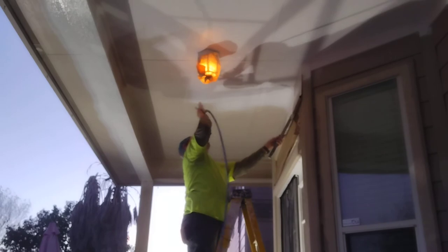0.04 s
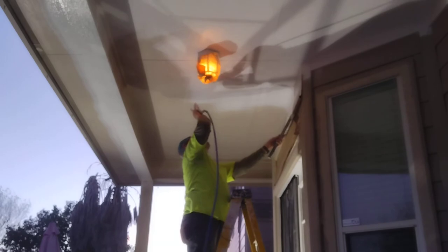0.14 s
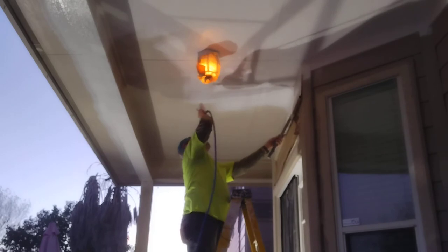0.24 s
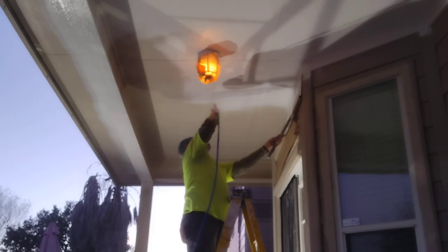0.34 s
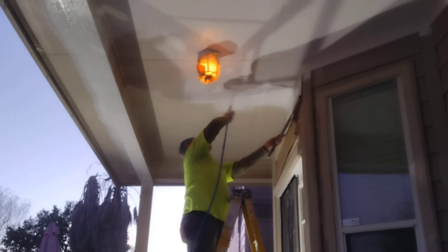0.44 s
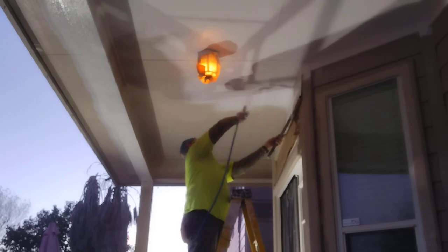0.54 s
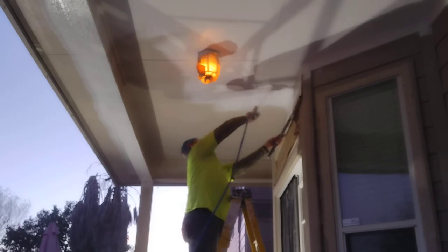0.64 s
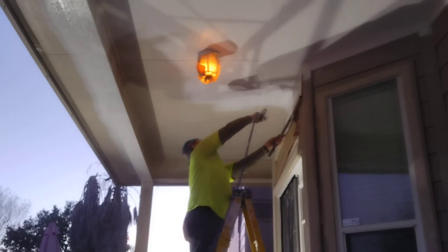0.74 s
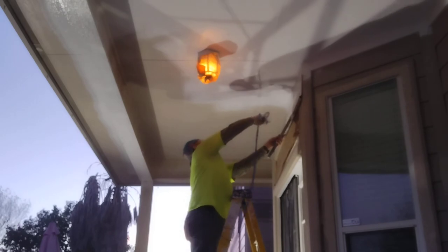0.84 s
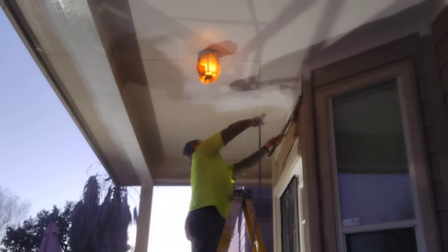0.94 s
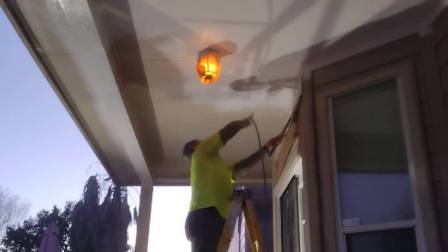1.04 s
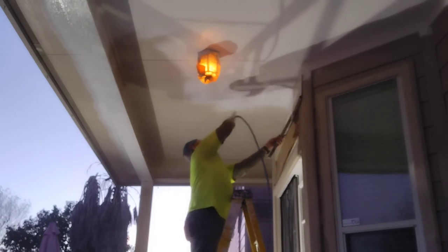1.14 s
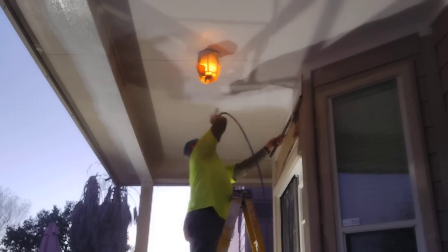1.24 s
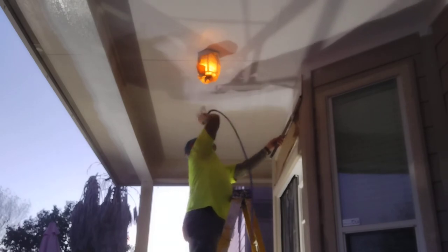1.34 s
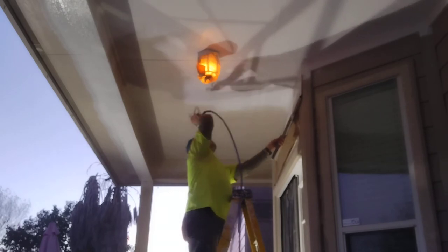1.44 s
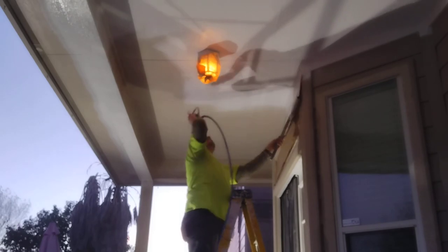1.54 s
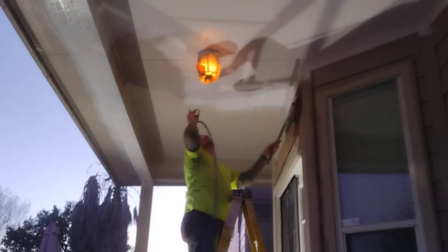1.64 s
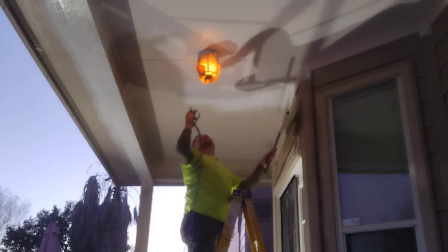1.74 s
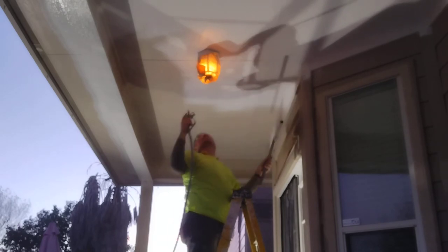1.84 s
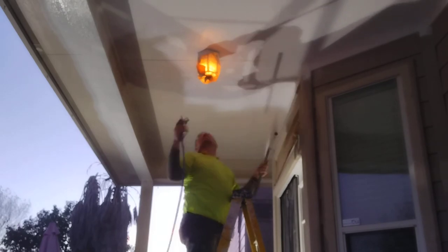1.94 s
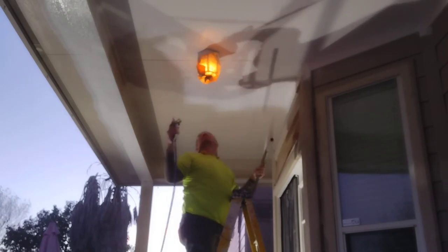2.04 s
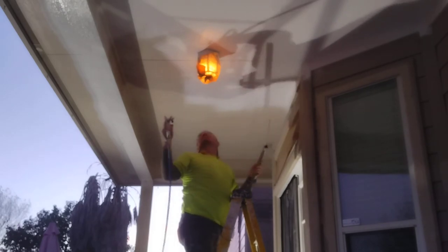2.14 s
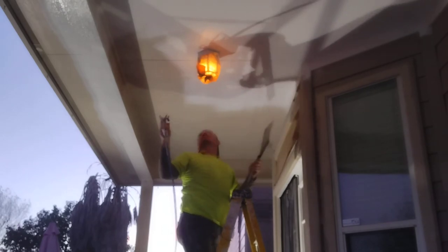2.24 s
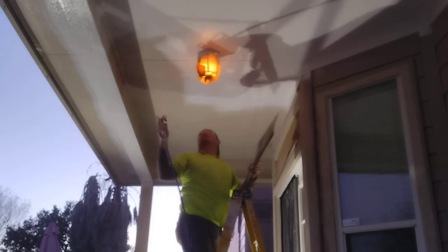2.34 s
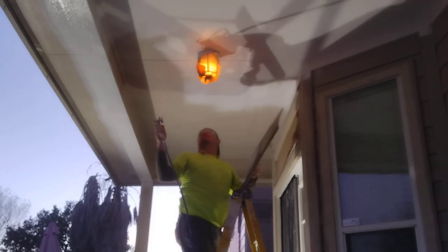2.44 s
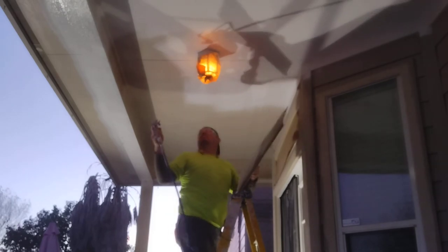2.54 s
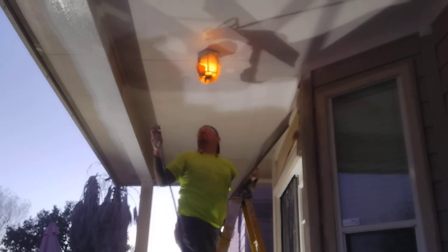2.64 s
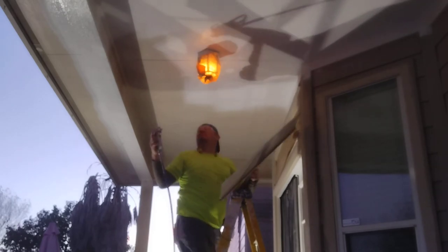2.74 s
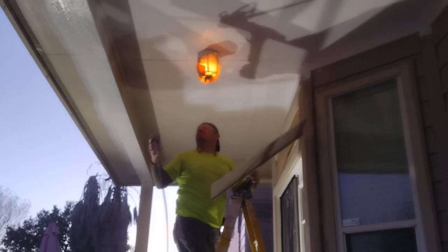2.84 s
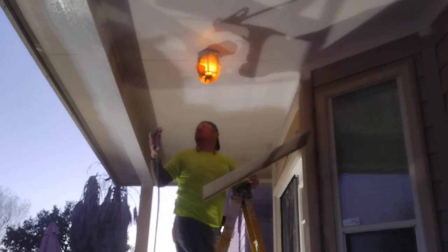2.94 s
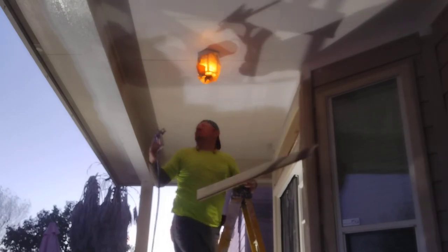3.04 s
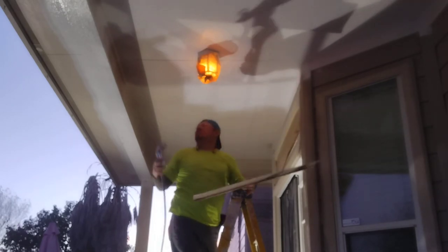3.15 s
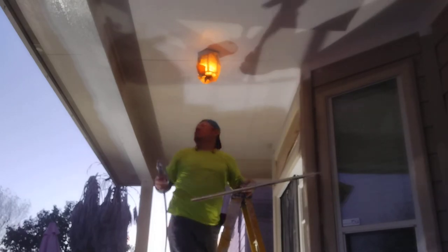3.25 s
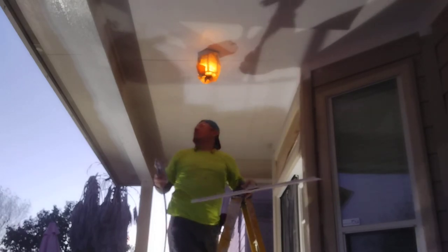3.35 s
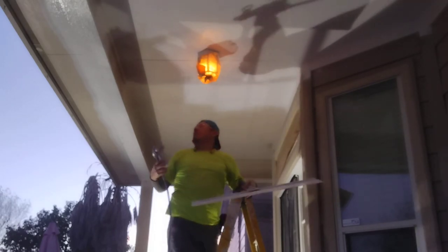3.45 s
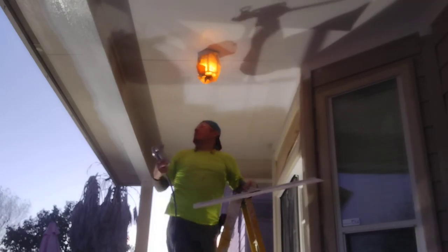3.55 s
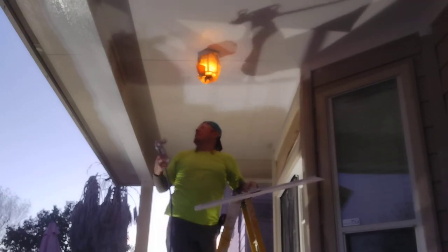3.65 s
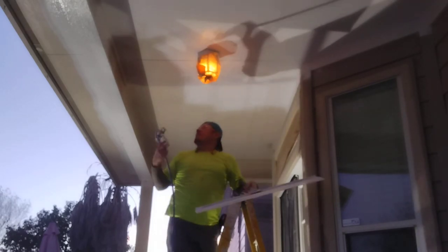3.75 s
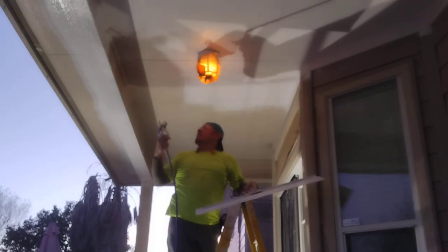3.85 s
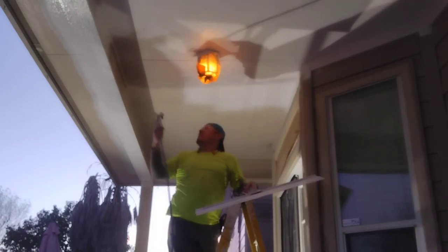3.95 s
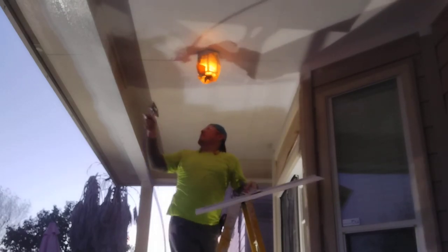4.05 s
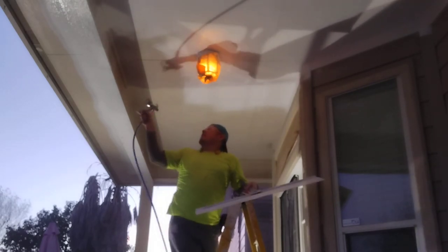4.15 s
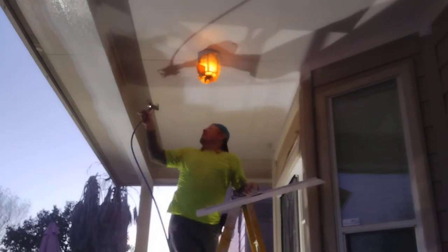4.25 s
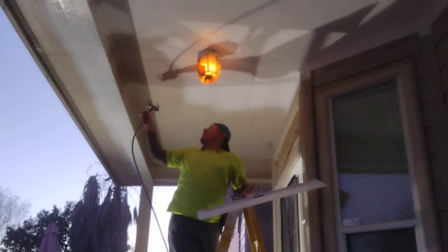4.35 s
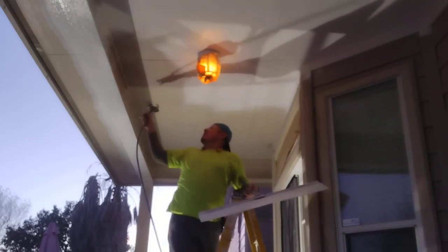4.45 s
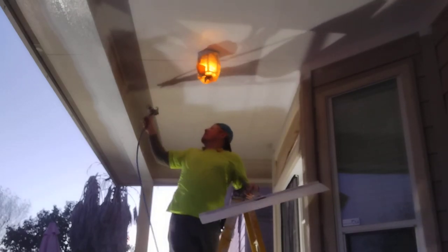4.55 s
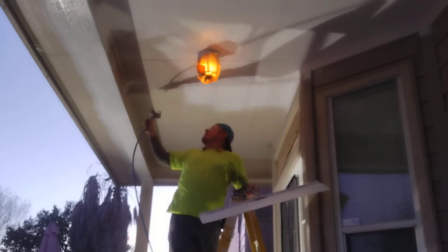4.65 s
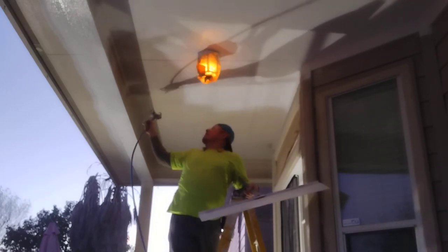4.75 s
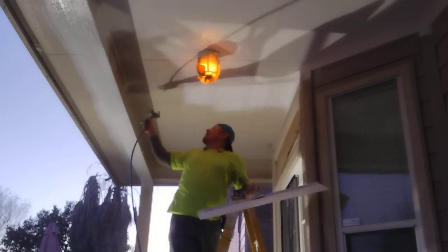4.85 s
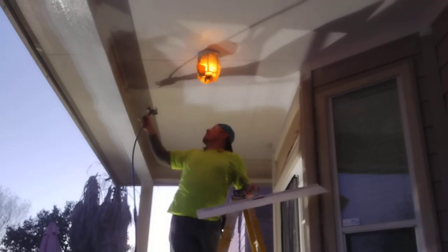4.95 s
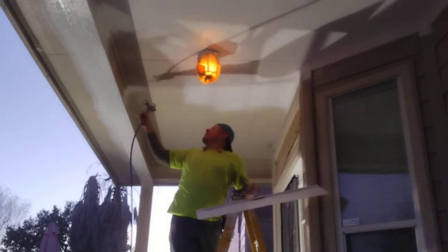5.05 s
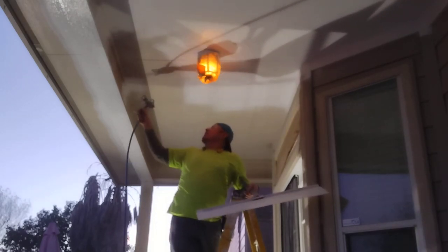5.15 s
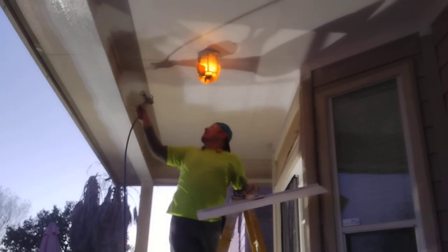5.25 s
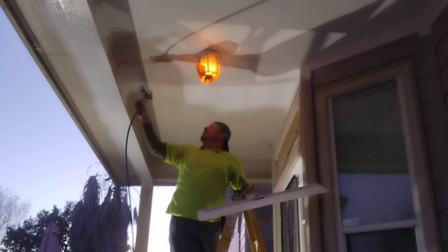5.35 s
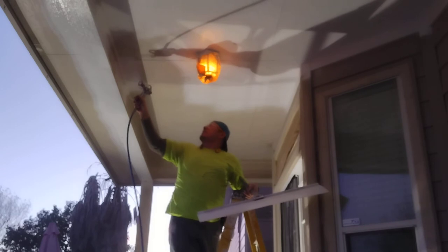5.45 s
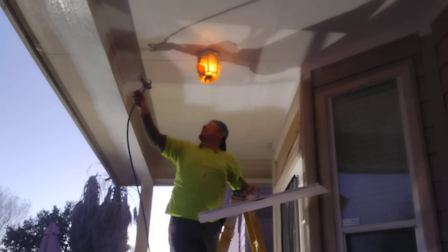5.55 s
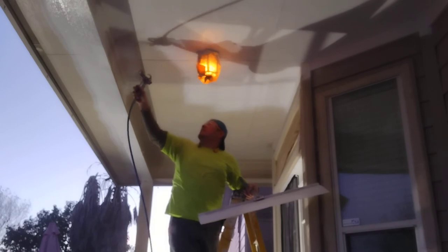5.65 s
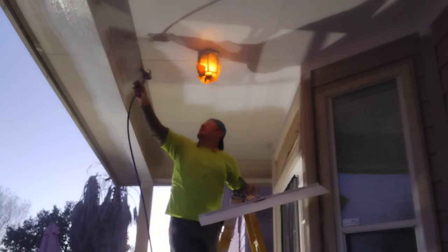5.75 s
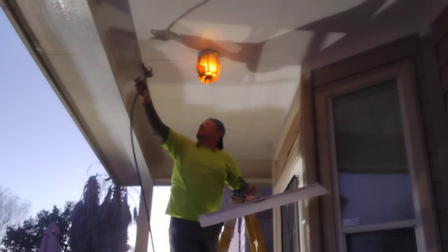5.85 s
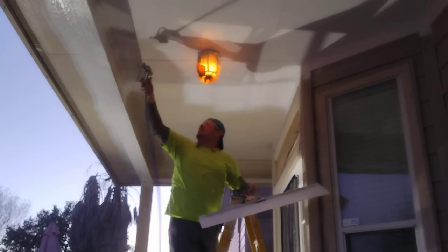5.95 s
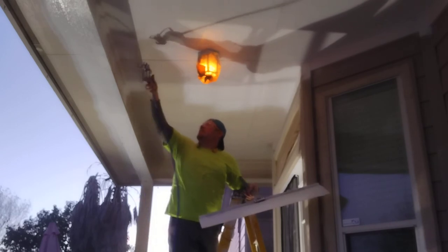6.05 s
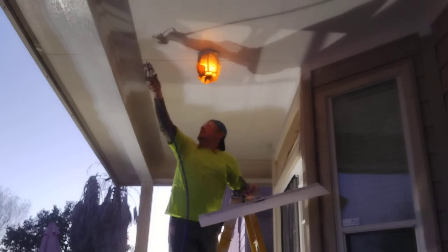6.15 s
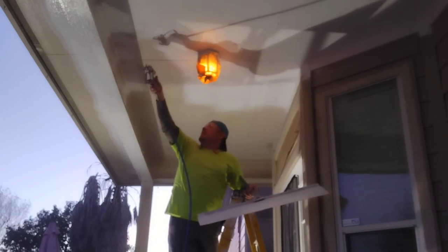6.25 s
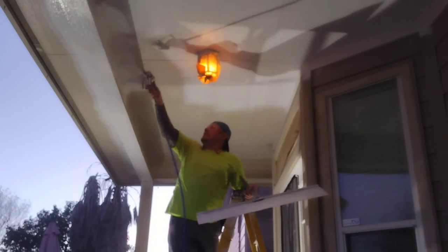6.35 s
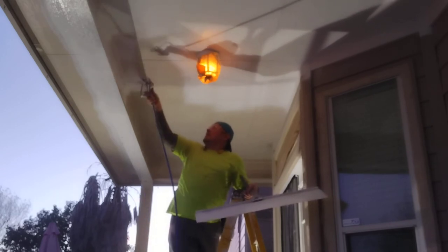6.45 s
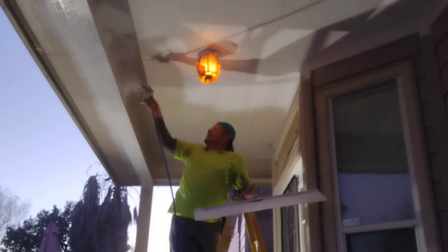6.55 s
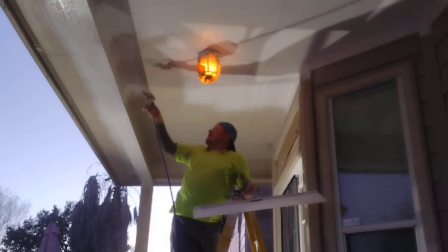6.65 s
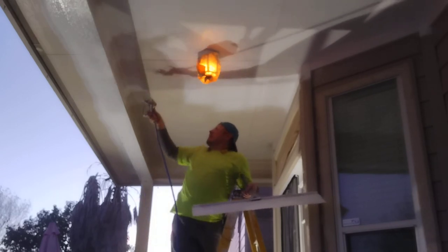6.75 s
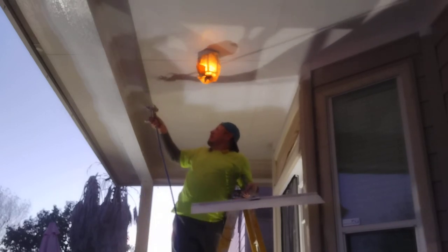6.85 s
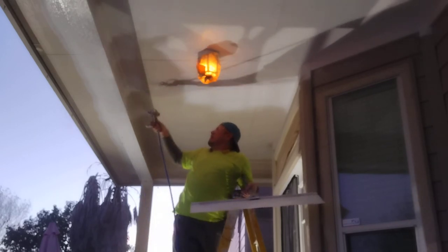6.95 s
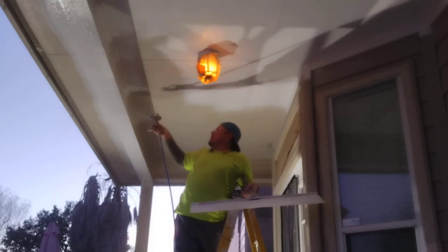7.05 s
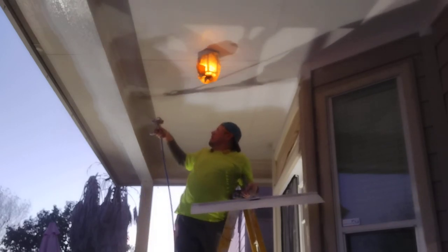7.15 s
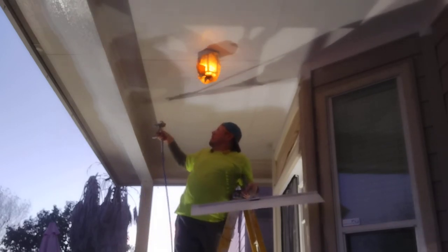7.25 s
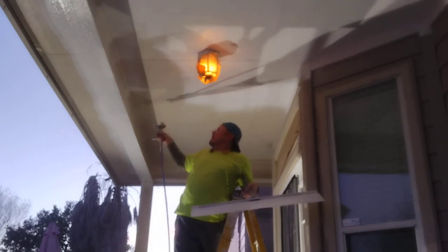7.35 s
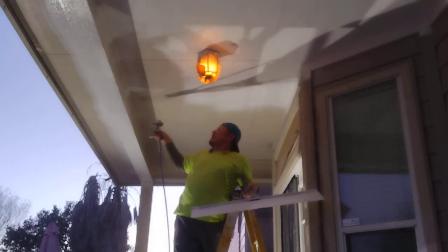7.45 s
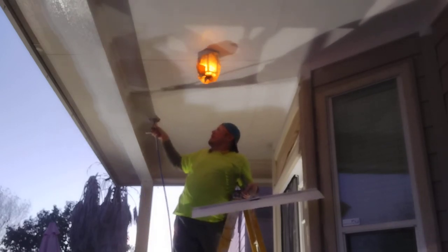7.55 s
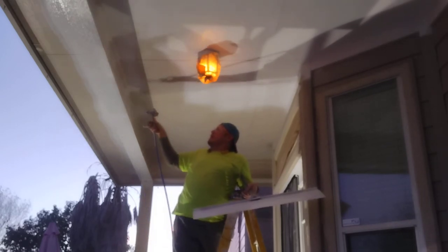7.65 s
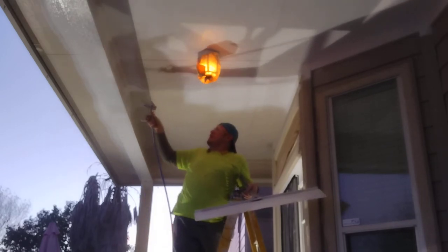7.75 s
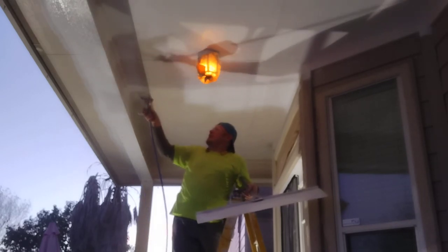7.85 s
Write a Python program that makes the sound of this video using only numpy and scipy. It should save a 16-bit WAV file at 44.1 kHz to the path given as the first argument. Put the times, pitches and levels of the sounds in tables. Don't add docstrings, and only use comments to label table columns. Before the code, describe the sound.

On a covered porch, a paint sprayer gives three short, sharp hisses while a piston pump grinds and whines, then coasts down. In the quiet gap a ladder and board knock, scuff and squeak faintly over distant street rumble. Three brighter, louder hisses follow, and the pump restarts with a low shake in the boards. Stereo, spray fairly close and slightly left, short porch reflections.

```python
import sys
import numpy as np
from scipy import signal
from scipy.fft import rfft, irfft
from scipy.io import wavfile

SR = 44100
rng = np.random.default_rng(int(sys.argv[2]) if len(sys.argv) > 2 else 0)


def elevation(decibels):
    levels = np.asarray(decibels, float)
    return 10 ** (levels / 20)


def output_pcm(signal):
    pcm = np.clip(np.atleast_2d(signal).T, -1, 1) * 32767
    wavfile.write(sys.argv[1], SR, np.round(pcm).astype(np.int16))


N = 348831

# open_s, close_s, jet_db, opening_shortfall_db, sag_db_per_s
TRIGGER_PULLS = [
    (-0.05, 0.137, -28, -0.5, -3),
    (0.322, 0.831, -25.5, 3.5, 6.5),
    (1.012, 1.466, -26.5, 4, 3),
    (5.056, 5.902, -22.5, 14.5, -1.5),
    (6.368, 7.285, -22.5, 1, 3),
    (7.588, 7.903, -21.5, 8, 0.5),
]
# freq_hz, density_db_per_hz
SPRAY_SPECTRUM = [(120, -51), (200, -24), (253, -25.5), (407, -31.5), (535, -29.5), (995, -21.5),
                  (1490, -25.5), (2140, -19), (3500, -21.5), (6270, -10), (6870, -6.5), (9890, -5),
                  (15600, -1.5)]
# freq_hz, density_db_per_hz
GEAR_SPECTRUM = [(290, -37), (500, -7), (537, -3), (621, -4), (1070, -8.5), (1240, 0.5), (1350, -13),
                 (1880, -8), (2770, -0.5), (4400, -14), (7500, -12), (13300, -17), (15600, -23)]
# freq_hz, width_hz, level_db
CASING_MODES = [(554, 3.5, 3), (887, 44, 1.5), (1271, 17.3, 7), (1468, 25, 6), (1687, 40, -0.5),
                (1809, 33, 4.5), (2080, 240, -0.5), (2368, 9.2, 5), (2650, 48, -2.5), (2900, 21, -0.5)]
# freq_hz, width_hz, level_db
DRONE_MODES = [(261, 43, -1.5), (378, 38, 2), (460, 110, -5.5), (563, 23, -6)]
# freq_hz, width_hz, level_db
RUMBLE_MODES = [(77, 32, -13), (134, 14, -3), (198, 30, -1)]
# time_s, effort_db
PUMP_RUNS = [
    [(0.0, -38), (0.35, -35), (0.56, -37.5), (0.72, -50), (0.8, -33.5), (1.15, -38), (1.48, -44),
     (1.85, -41.5), (2.35, -76.5)],
    [(5.43, -44), (5.65, -35), (5.98, -31.5), (6.4, -33.5), (6.95, -44.5), (7.1, -33.5), (7.4, -33.5),
     (7.6, -37.5), (7.91, -35.5)],
]
# time_s, swell_db, whine_hz, whine_re_load_db
PISTON_STROKES = [(0.04, 5.5, 2040, -9), (0.105, 0.5, 2090, -15), (0.171, 3.5, 2176, -2),
                  (0.31, 4, 1868, -4.5), (0.5, 1, 2060, -20), (0.82, -1, 2040, -9), (0.97, 6, 1994, -4.5),
                  (1.12, 4, 1970, -11), (1.33, 3.5, 2020, -17), (1.44, -1.5, 1970, -10),
                  (1.55, 3.5, 2170, -9.5), (1.65, 9.5, 1874, 0.5), (1.81, 3, 2065, -9), (1.9, 1, 1990, -15),
                  (2.0, 4, 2200, -22), (2.111, 9, 2057, -16), (2.19, 6.5, 1944, -25),
                  (2.29, 9.5, 2080, -13), (5.69, 2, 2050, -2), (5.83, 0.5, 2150, -10),
                  (5.95, 5.5, 1822, -8), (6.058, 4.5, 1902, -25), (6.152, 2, 2204, -10),
                  (6.291, -3, 1890, -1.5), (6.39, -3, 2100, -7), (7.2, -1.5, 2000, -7), (7.3, 1, 2100, -19),
                  (7.41, 3.5, 2068, -12), (7.512, 4.5, 1997, -7), (7.66, 6.5, 2072, -29)]
# time_s, swell_db
VALVE_THROBS = [(0.0, 7.5), (0.12, 9.5), (0.23, 7.5), (0.33, 7), (0.44, 4.5), (0.93, 6.5), (1.09, 8.5),
                (1.22, 5), (1.32, 1), (1.5, 4), (1.59, 7.5), (1.7, 7.5), (1.81, 8.5), (5.67, 4), (5.78, 3),
                (5.92, 6.5), (6.04, 7.5), (6.14, 10.5), (6.24, 4.5), (6.38, 1), (6.5, -1.5), (7.03, 3),
                (7.19, 1.5), (7.28, 4.5), (7.37, 6), (7.63, 6.5), (7.74, 9), (7.84, 7.5)]
# time_s, peak_db,
# ring_hz, thud_re_peak_db, scratch_re_peak_db
KNOCKS = [(1.88, -28.5, 2050, -24, -35), (2.0951, -46, 2080, -10, -14),
          (2.2717, -53.5, 2050, -14, -19), (2.5164, -67.5, 1030, -2.5, -12),
          (2.652, -52.5, 1320, -9, -7.5), (2.819, -57.5, 2090, -14, -10),
          (2.8804, -65.5, 1030, -5, -29.5), (3.008, -52, 1490, -5, -30),
          (3.0385, -57, 1100, -6.5, -12), (3.316, -32, 1370, -33, -31), (3.38, -36, 1300, -8, -16),
          (3.468, -46, 1400, -13, -18), (3.6994, -64, 1600, -2, -16), (3.792, -49, 1520, -11, -19),
          (4.2118, -60, 1560, -13, -18.5), (4.2825, -54, 1510, -8.5, -17),
          (4.564, -53, 1260, 8.5, -23.5), (4.581, -46, 2620, -6, -20.5),
          (5.435, -33.5, 2100, -25, 7), (6.368, -34, 1270, 2.5, -6), (6.975, -33.5, 1260, 4.5, 4)]
# pitch_hz, width_hz, level_db
SQUEAK_TONES = [(3330, 160, -77), (1420, 300, -66), (2350, 40, -83), (5000, 4700, -75), (387, 50, -63.5),
                (3200, 900, -84), (200, 200, -50.5), (1050, 800, -50), (9000, 9000, -71), (8000, 9000, -74),
                (14000, 4000, -73)]
# start_s, end_s
SQUEAK_TIMES = [(3.15, 3.29), (3.1, 3.58), (4.75, 5.2), (3.02, 3.6), (4.55, 5.1), (4.48, 4.66),
                (4.555, 4.63), (3.312, 3.44), (2.645, 2.69), (3.0, 3.07), (1.7, 2.2)]
# freq_hz, density_db_per_hz
STREET_SPECTRUM = [(25, -30), (50, -9), (65, -0.5), (100, -0.5), (160, -2), (200, -2), (310, -6),
                   (500, -9.5), (1000, -11), (1300, -18), (2000, -25.5), (3200, -30.5), (8000, -39),
                   (15600, -39)]
# freq_hz, likeness (1 = same, 0 = unrelated)
STEREO_LIKENESS = [(60, 1), (130, 0.94), (290, 0.9), (640, 0.19), (1400, 0.13), (5000, -0.048),
                   (15000, -0.046)]

OPEN_S, BUILD_S, CLOSE_S, CLOSE_DB = 0.013, 0.1, 0.022, 9
FULLNESS_DB, THIN_DB_PER_DB, FULLER_DB_PER_S = 4.5, 0.72, 4.5
JET_PAN_DB, PAN_WANDER_DB = 2.5, 0.7
STROKE_S, GLIDE_HZ_PER_S, IDLE_HZ, IDLE_WHINE_DB = 0.035, -1500, 2040, -18
THROB_S, DRONE_DB, DRONE_FOLLOWS, RUMBLE_DB, RUMBLE_FOLLOWS = 0.03, -50.5, 0.63, -54.5, 0.39
DECK_S, DECK_RISE_S, DECK_DRONE_DB, DECK_RUMBLE_DB = 6.3, 0.15, 5.5, 8.5
KNOCK_T60_S = 0.08
PORCH_T60_S, PORCH_DB, PORCH_DULL_HZ = 0.28, -9, 9000
STREET_DB = -60.5


def spray():
    gain, tilt_db = np.zeros(N), np.zeros(N)
    for start, end, jet_db, short_db, sag in TRIGGER_PULLS:
        t = np.arange(N) / SR - start
        held = np.maximum(t, 0)
        shut = np.maximum(t + start - end, 0) / CLOSE_S
        level_db = jet_db - short_db / (1 + held / BUILD_S) - sag * held - CLOSE_DB * shut
        gate = np.clip(t / OPEN_S, 0, 1) * np.clip(2 - shut, 0, 1)
        gain += gate * elevation(level_db)
        fuller_db = FULLNESS_DB + FULLER_DB_PER_S * held - THIN_DB_PER_DB * (jet_db + 25.5)
        tilt_db += (gate > 0) * fuller_db
    hiss = banded(SPRAY_SPECTRUM, 200.1, patchy_db=0.6, flicker=5.2, tilt_db=tilt_db)
    hiss = hiss + 1.5 * resonate(hiss, 14700, 1700)
    pan_db = JET_PAN_DB + PAN_WANDER_DB * drift(3)
    return gain * elevation(-0.16) * panned(pan_db) * hiss


def pump():
    gate, effort_db = in_time(PUMP_RUNS, fade_s=0.013)
    swell_db, whine_hz, whine_db = strokes()
    load_db = effort_db + swell_db
    casing = modes(pair() * elevation(2.6 * drift(67)), CASING_MODES)
    whine = elevation(whine_db) * mesh_whine(whine_hz)
    left, right = elevation(-1.5) * gear_clatter(load_db) + elevation(-3.0) * casing + whine
    left = 0.98 * left + 0.15 * np.roll(right, shift=17)
    return gate * (elevation(load_db) * np.array([left, right]) + pump_shake(effort_db))


def strokes():
    swell_db, whine_hz, whine_db = 0, IDLE_HZ, IDLE_WHINE_DB
    for s, db, hz, tone_db in PISTON_STROKES:
        near, t = bell(s, STROKE_S)
        swell_db = swell_db + db * near
        whine_hz = whine_hz + near * (hz + GLIDE_HZ_PER_S * t - IDLE_HZ)
        whine_db = whine_db + near * (tone_db - IDLE_WHINE_DB)
    return swell_db, whine_hz, whine_db


def gear_clatter(load_db):
    dull_db = np.clip(-0.25 * (load_db + 26), 0, 6)
    return elevation(-1.6 * dull_db) * banded(GEAR_SPECTRUM, 535, patchy_db=2.0, flicker=36, tilt_db=dull_db)


def mesh_whine(whine_hz):
    phase = 2 * np.pi * np.cumsum(whine_hz * (1 + 0.02 * drift(12))) / SR
    flutter = elevation(2.5 + 4.45 * np.array([drift(25), drift(25)]))
    return flutter * np.sin(phase + np.array([drift(6.8), drift(8)]))


def pump_shake(effort_db):
    deck = np.clip((np.arange(N) / SR - DECK_S) / DECK_RISE_S, 0, 1)
    throb_db = sum(db * bell(s, THROB_S)[0] for s, db in VALVE_THROBS)
    drone_db = DRONE_DB + DRONE_FOLLOWS * (effort_db + 38.5) + throb_db + DECK_DRONE_DB * deck
    rumble_db = RUMBLE_DB + RUMBLE_FOLLOWS * np.minimum(effort_db + 34, 0)
    rumble_db = rumble_db + DECK_RUMBLE_DB * deck + 2.5 * drift(5)
    shake = pair()
    drone = cut(modes(shake, DRONE_MODES), [200, 700], "band")
    rumble = cut(modes(shake, RUMBLE_MODES), [45, 260], "band")
    return elevation(drone_db) * drone + elevation(rumble_db) * rumble


def knocks():
    out, t, rub = np.zeros((2, N)), np.arange(int(0.4 * SR)) / SR, pair()
    for s, peak_db, hz, thud_db, scratch_db in KNOCKS:
        at = round(s * SR)
        burst = rub[:, at:at + len(t)] * elevation(-60 * t / KNOCK_T60_S) * np.minimum(t / 0.0062, 1)
        body = cut(burst, [600, 3600], "band")
        ringing = 6.3 * resonate(resonate(burst, hz, 610), hz, 610) + 1.72 * body
        thud = elevation(thud_db + 18.5) * cut(burst, [170, 1000], "band")
        scratch = cut(burst, [3600, 6800], "band")
        air = cut(burst, [6800, 15000], "band")
        air_db = -0.45 * (peak_db + 45)
        top = elevation(scratch_db - 16.0) * (scratch + elevation(air_db - 5) * air)
        out[:, at:at + len(t)] += elevation(peak_db - 2.5) * (ringing + thud + top)
    return out * panned(np.full(N, 1.8))


def squeaks():
    t, rub, out = np.arange(N) / SR, pair(), 0
    for (start, end), (hz, width, db) in zip(SQUEAK_TIMES, SQUEAK_TONES):
        along = np.clip((t - start) / (end - start), 0, 1)
        swell = np.sin(np.pi * along ** 0.87)
        tone = rms_one(resonate(resonate(rub, hz, width), hz, width))
        out = out + elevation(db) * swell * tone
    return out


def porch(x):
    t = np.arange(int(0.6 * SR)) / SR
    tail = cut(rng.standard_normal((2, len(t))), PORCH_DULL_HZ, "low", order=1)
    tail = tail * elevation(-60 * t / PORCH_T60_S) * (t > 0.004)
    tail = tail / np.sqrt(np.sum(tail ** 2, axis=1, keepdims=True))
    return elevation(PORCH_DB) * signal.fftconvolve(x, tail, axes=1)[:, :N]


def street():
    return elevation(STREET_DB) * banded(STREET_SPECTRUM, 22.7, patchy_db=-1.25, flicker=6.1)


def banded(spectrum, low_hz, patchy_db, flicker, tilt_db=0):
    edges = low_hz * 2 ** np.arange(0, np.log2(19000 / low_hz), 0.5)
    white, together, out, power = [pair(), pair()], drift(flicker / 3), 0, 0
    for k, (low, high) in enumerate(zip(edges, edges[1:])):
        hz = np.sqrt(low * high)
        level_db = at_hz(spectrum, hz)
        power += elevation(level_db) ** 2 * (high - low) * 2 / SR
        lift_db = tilt_db * np.clip(np.log2(10000 / hz), 0, 1.6)
        flicker_db = patchy_db * (1.3 * together + drift(flicker))
        out = out + elevation(level_db + lift_db + flicker_db) * cut(white[k % 2], [low, high], "band")
    return out / np.sqrt(power)


def pair():
    mid, side = rfft(rng.standard_normal((2, N)))
    alike = np.clip(at_hz(STEREO_LIKENESS, np.fft.rfftfreq(N, 1 / SR) + 1), -1, 1)
    both = np.sqrt(1 + alike) * mid + np.sqrt(1 - alike) * side * [[1], [-1]]
    return irfft(both, N) / np.sqrt(2)


def modes(x, peaks):
    rings = ((-1) ** k * elevation(db) * resonate(x, hz, width) for k, (hz, width, db) in enumerate(peaks))
    return rms_one(sum(rings))


def resonate(x, hz, width_hz):
    r = np.exp(-np.pi * width_hz / SR)
    poles = [1, -2 * r * np.cos(2 * np.pi * hz / SR), r * r]
    return signal.lfilter([(1 - r * r) / 2, 0, (r * r - 1) / 2], poles, x)


def cut(x, hz, kind, order=2):
    return signal.sosfilt(signal.butter(order, hz, kind, fs=SR, output="sos"), x)


def drift(rate):
    r = np.exp(-80 * np.pi * rate / SR)
    slow = signal.lfilter([1], [1, -2 * r, r * r], rng.standard_normal(N // 40 + 2002))[2000:]
    return np.interp(np.arange(N) / 40, np.arange(len(slow)), rms_one(slow))


def bell(s, width_s):
    t = np.arange(N) / SR - s
    return np.exp(-0.5 * (t / width_s) ** 2), t


def in_time(tables, fade_s):
    t, gate = np.arange(N) / SR, np.zeros(N)
    for rows in tables:
        start, end = rows[0][0], rows[-1][0]
        gate += np.clip(np.minimum(t - start, end - t) / fade_s + 1, 0, 1) ** 2
    return gate, np.interp(t, *np.concatenate(tables).T)


def at_hz(points, hz):
    point_hz, value = np.array(points).T
    return np.interp(np.log(hz), np.log(point_hz), value)


def panned(pan_db):
    return elevation(np.array([pan_db / 2, -pan_db / 2]))


def rms_one(x):
    return x / np.sqrt(np.mean(x ** 2) + 1e-20)


def scene():
    jet, blows = spray(), knocks()
    echo = porch(jet + elevation(0.5) * blows)
    return jet + blows + echo + pump() + squeaks() + street()


def band_limit(x):
    return signal.sosfilt(signal.butter(12, 16860, fs=SR, output="sos"), x)


def record(dry):
    mix = signal.sosfilt(signal.cheby2(20, 46, 15900, fs=SR, output="sos"), dry)
    return band_limit(mix)


dry = scene()
out = record(dry)
output_pcm(out)
```